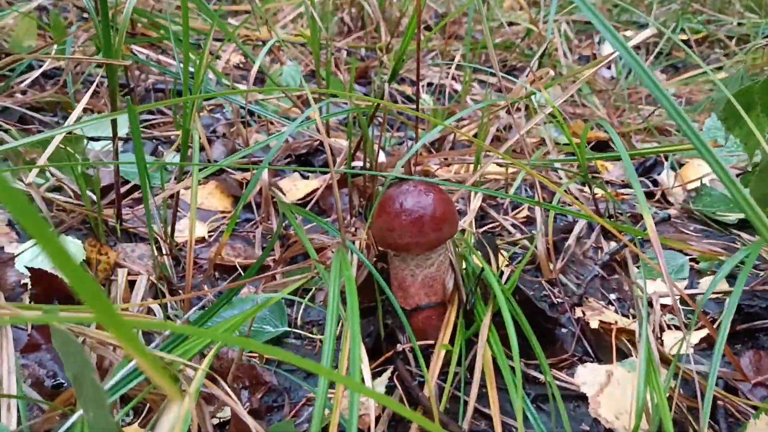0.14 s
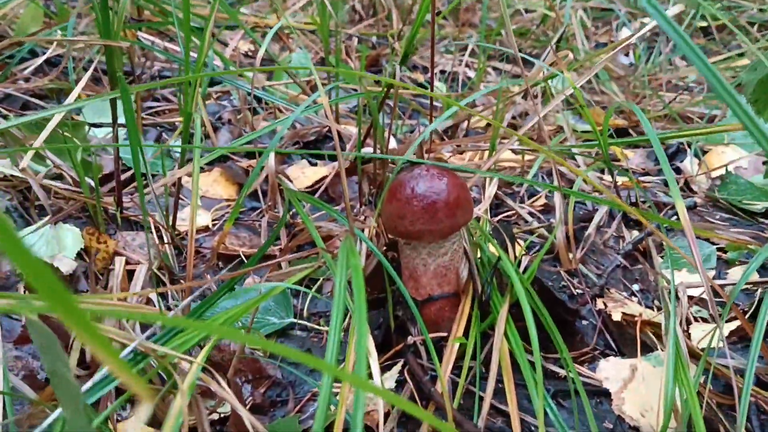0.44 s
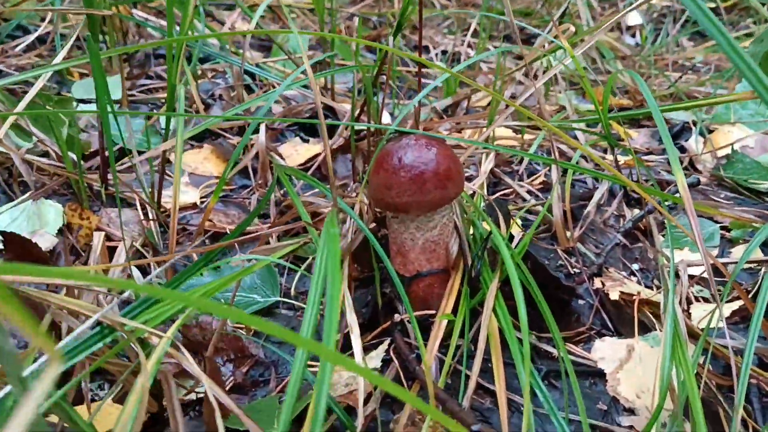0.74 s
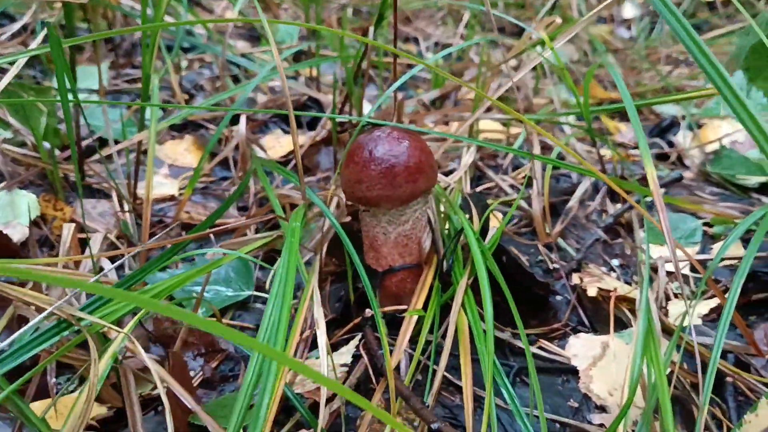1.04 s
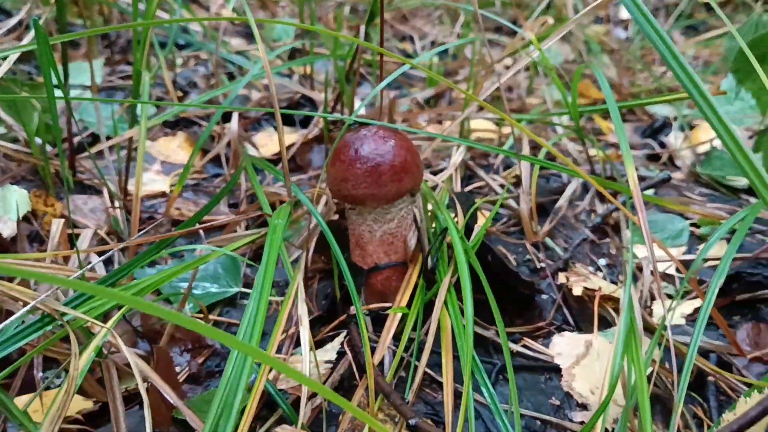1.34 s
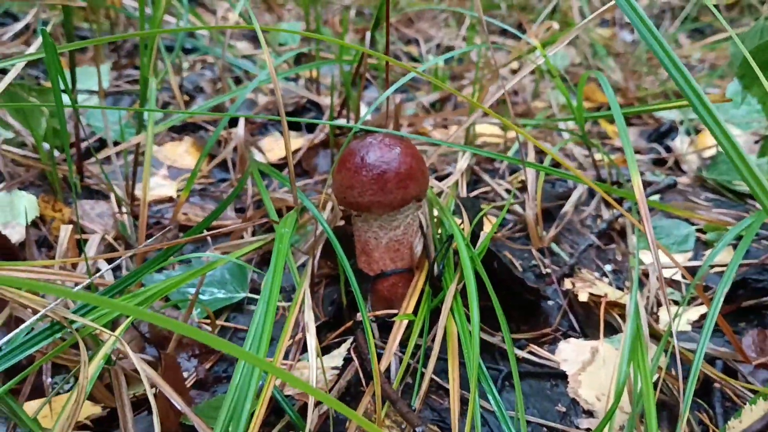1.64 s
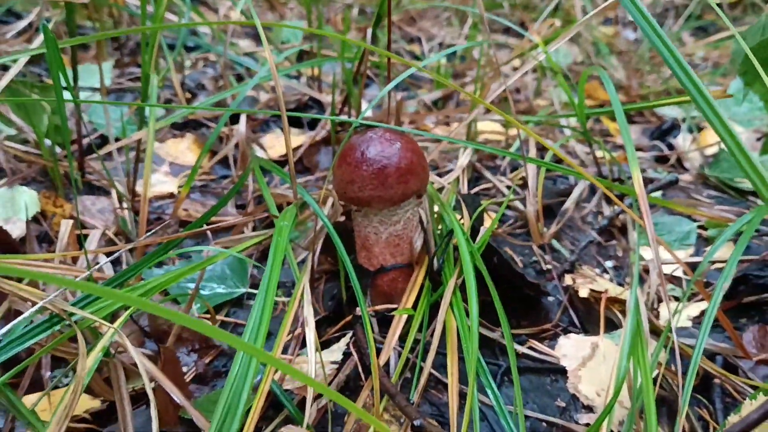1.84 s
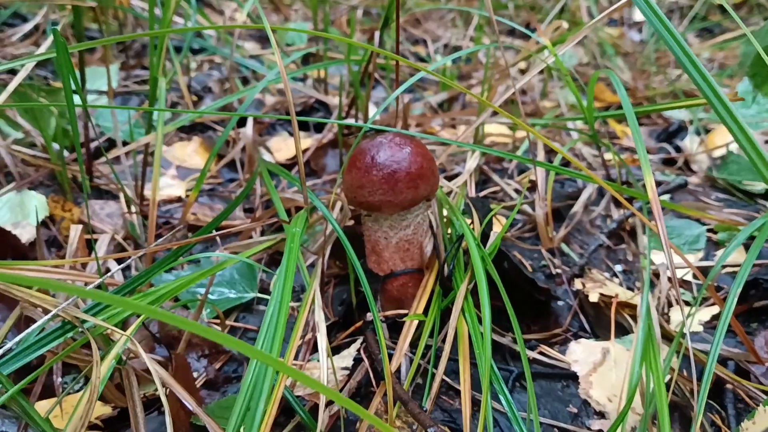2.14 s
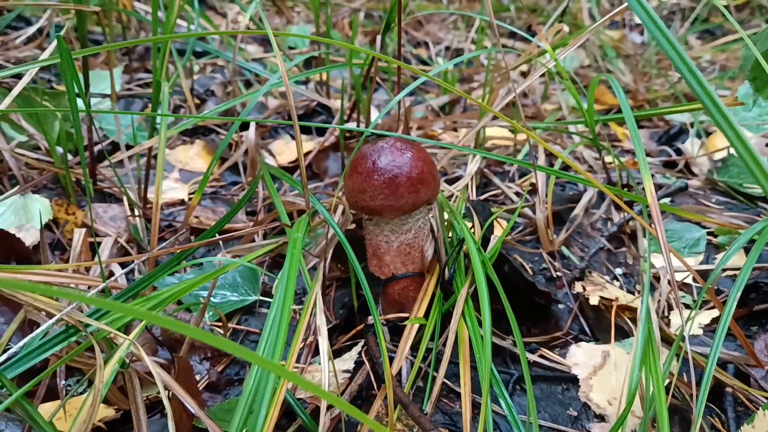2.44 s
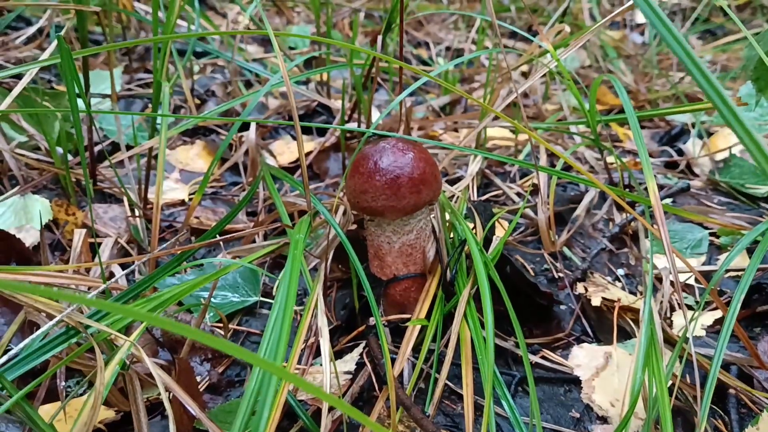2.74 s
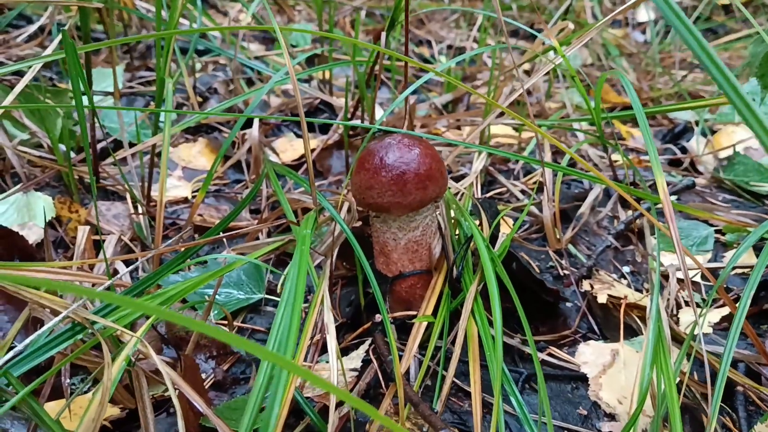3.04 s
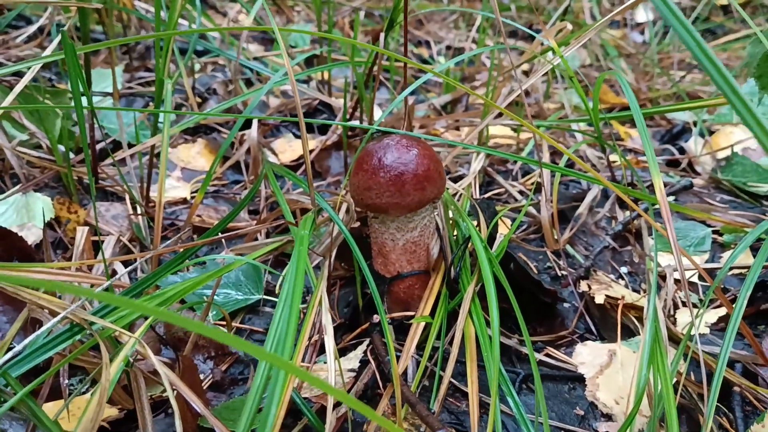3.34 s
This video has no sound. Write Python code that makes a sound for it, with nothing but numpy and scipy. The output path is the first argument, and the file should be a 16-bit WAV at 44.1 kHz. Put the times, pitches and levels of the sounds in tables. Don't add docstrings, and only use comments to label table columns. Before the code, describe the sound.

Water drops fall on wet leaves and grass under trees, a steady soft hiss with sparse ticks and thuds; a hard knock at two seconds, a crisp splat near three, heard by a low handheld stereo microphone.

```python
import sys
import numpy as np
from scipy import signal
from scipy.io import wavfile
from scipy.ndimage import uniform_filter1d

SR = 44100
rng = np.random.default_rng(int(sys.argv[2]) if len(sys.argv) > 2 else 0)


def dump(signal):
    limited = np.clip(np.atleast_2d(signal).T, -1, 1)
    pcm = np.round(limited * 32767).astype(np.int16)
    wavfile.write(sys.argv[1], SR, pcm)


def invert_db(x):
    u = np.asarray(x, float) / 20
    return 10 ** u


N = 154350

# pitch_hz, level_db (per Hz)
HISS_COLOUR = [(300, -9), (800, -5.5), (1500, -1.5), (2100, 2), (3300, -1), (4200, -7), (6500, -7.5),
               (8500, -11.5)]
# pitch_hz, level_db (per Hz)
MIST_COLOUR = [(8000, -13), (10000, -16.5), (13000, -17.5), (16500, -24.5)]
# pitch_hz, level_db (per Hz)
RUMBLE_COLOUR = [(20, -35), (35, -29), (60, 3), (100, 0), (150, -10.5), (300, -6.5), (600, -16)]
# pitch_hz, likeness (-1 to 1)
LIKENESS = [(60, 0.54), (240, 0.65), (950, -0.19), (3770, 0.054), (15000, 0.01)]
# pitch_hz, left_minus_right_db
BALANCE = [(60, 5.5), (130, -4.5), (290, 0), (640, -0.5), (1410, 0.5), (3100, -3), (6820, -10.5),
           (15000, 10)]
# time_s, shade (0-1), level_db
POSE = [
    (0, 1, 1.5),
    (.4, 1, 1),
    (.62, 0, 0.5),
    (1.8, 0.23, 1.53),
    (3.1, 0, 0.5),
    (3.5, 0.14, -0.8),
]
# pitch_hz, level_db
PATTER_COLOUR = [(100, -1.5), (700, 19), (2500, 9), (6000, -11), (14000, -3.5)]
# start_s, peak_db, pitch_hz, left_minus_right_db, left_late_ms
THUDS = [(0.252, -42, 86, -16, 0.21), (.443, -39, 151, -27, -0.15), (0.454, -39.5, 78, -27, 0),
         (0.7517, -35.5, 605, 6, -0.38), (0.8009, -33.5, 280, -3, 0.38), (0.8103, -39.5, 173, 0, 0),
         (1.018, -43.5, 156, 2, 0), (1.2422, -43, 413, 1, 0.2), (1.7595, -44.5, 260, -23, -0.18),
         (1.825, -41.5, 327, -2, 0.094), (1.9084, -31, 340, -19, 0.11), (1.9414, -33, 230, -22.5, 0.082),
         (1.948, -39.5, 100, -18, 0), (2.0422, -42.5, 300, -24, 0), (2.098, -38.5, 231, -23, 0),
         (2.531, -39.5, 263, -19, 0.32), (2.9392, -25, 183, 19, 0.19), (2.9466, -44, 130, 12, 0.35),
         (3.002, -42, 307, -1, 0.32)]
# start_s, peak_db
KNOCKS = [
    (1.911, -28),
    (2.0047, -14),
]
# start_s, peak_db, pitch_hz, left_minus_right_db
TICKS = [(0.2388, -34, 2670, 2.5), (0.2889, -25.5, 2750, -11.5), (0.8001, -36, 1750, -1),
         (1.3446, -37, 2170, -1), (1.4365, -32.5, 2220, 4), (1.4507, -36.5, 1300, 3),
         (1.509, -35, 3080, -9), (1.9080, -27, 890, -14), (.7512, -39, 2100, 0),
         (2.0028, -10.5, 1040, -10.5), (2.0026, -18, 2030, -21), (2.0049, -23.5, 3530, -7),
         (2.3414, -32.5, 2950, 2), (2.617, -34.5, 1010, 4), (2.652, -33.5, 1630, -1),
         (2.672, -31.5, 1900, -3), (2.9389, -28.5, 1900, 3.5), (2.9594, -23, 2170, 3.5),
         (2.9638, -11.5, 2860, -3), (2.9690, -20.5, 2040, 10), (3.1452, -36, 2070, 11),
         (3.1752, -24, 1730, -10), (3.1795, -37, 910, -22), (3.1812, -24.5, 1360, -15),
         (3.183, -26.5, 930, -20), (3.386, -44, 1230, -2)]
# start_s, rms_db, pitch_hz, fade_ms, left_minus_right_db
SPRAYS = [(.2384, -37, 14000, 6.8, 25), (0.7507, -37.5, 11700, 12, 17), (0.8009, -35.5, 7200, 35, -14),
          (3.1803, -43, 12500, 15, -10), (1.4440, -33, 3250, 38, -8), (1.451, -47, 12500, 15, 13),
          (1.478, -47, 9000, 12, -8), (1.4785, -30.5, 3450, 25, -11), (2.0030, -26, 7400, 7.6, -35),
          (2.1433, -39.5, 2580, 120, -15), (2.5749, -26.5, 7900, 6.1, -23), (2.5787, -28.5, 16000, 19, -1),
          (2.651, -37.5, 6000, 23, -19), (2.938, -45, 6060, 23, -15), (2.9458, -22, 12400, 10.7, 1),
          (3.0644, -48, 11000, 25, 8), (3.069, -42, 8800, 43, -2), (3.1750, -42, 12000, 9, -8),
          (3.3037, -41, 13000, 9.3, 11), (3.386, -47.5, 10700, 25, 8)]
# start_s, rms_db, fade_ms
SHATTER = [
    (2.9594, -20.5, 34),
    (2.9592, -23, 10),
    (2.9615, -20.5, 16),
    (2.9628, -15.5, 10.8),
    (2.9638, -11.5, 9.9),
    (2.9652, -17, 7.5),
    (2.9688, -29.5, 13),
    (2.9708, -18, 11),
]
# pitch_hz, width_hz, level_db
LEAF = [(1900, 670, -1), (2830, 700, 2.5), (5160, 540, -6), (7200, 1070, -4.5), (10800, 1700, -15.5),
        (15000, 1800, -30)]

HISS_DB, RUMBLE_DB = -49, -61
SHADE_HZ, SHADE_OCTAVES, SHADE_DB = 7300, 0.2, -8
SPITS_PER_S, SPITS_DB, SPIT_FADE_MS, SPIT_HZ, SPIT_WIDTH_HZ = 45, -66.5, 14, 9000, 12000
PATTER_PER_S, PATTER_DB, PATTER_SPREAD_DB = 260, -67, 4.0
ECHO_DB, ECHO_T60_S = -23.5, 0.079
THUD_CYCLES, THUD_SAG, THUD_RISE = 4.6, 0.067, 0.04
SHELL_HZ, SHELL_CYCLES, SHELL_SIDE_DB, SHELL_LATE_MS = 424, 9.4, 2, -0.63
REBOUND_HZ, REBOUND_DB, REBOUND_SIDE_DB, REBOUND_EARLY_S = 145, -5.5, -9, 0.002
TICK_CYCLES, TICK_STIFF, TICK_SAG, TICK_RISE = 4.08, 0.41, 0.087, 0.17
LAG_MS_PER_DB = 0.03
SPRAY_WIDTH, SPRAY_WIDE_DB, SPRAY_RISE_MS = 0.32, -14, 0.19
LEAF_SIDE_DB, LEAF_LIKENESS = -7, 0.8
LOW_CUT_HZ, EDGE_HZ, EDGE_DB = 75, 15900, -32


def evened(x):
    return x / np.sqrt(np.mean(x ** 2) + 1e-20)


def read(points, hz):
    f, value = np.transpose(points)
    return np.interp(np.log(hz + 1), np.log(f + 1), value)


def add(mix, start_s, sound, side_db, late_ms=0.):
    share = invert_db(side_db) / (1 + invert_db(side_db))
    places = [(share, start_s + late_ms / 1000), (1 - share, start_s)]
    for ear, (gain, at) in enumerate(places):
        part = mix[ear, round(at * SR):][:sound.shape[-1]]
        part += 2 * gain * np.atleast_2d(sound)[-ear][:len(part)]


def resonate(x, hz, width_hz):
    pole = np.exp((2j * np.pi * hz - np.pi * width_hz) / SR)
    return 2 * signal.lfilter([1 - abs(pole)], [1, -pole], x).real


def plop(hz, cycles, sag, rise):
    u = np.arange(round(SR / hz * 14)) * hz / SR
    swing = -np.sin(2 * np.pi * np.log1p(sag * u) / sag)
    shape = swing * (1 - np.exp(-u / rise)) ** 2 * invert_db(-60 * u / cycles)
    return shape / abs(shape).max()


def burst(fade_ms, likeness):
    ms = np.arange(2600) * 1000 / SR
    one, other = rng.standard_normal((2600, 2)).T
    pair = np.array([one, likeness * one + np.sqrt(1 - likeness ** 2) * other])
    return pair * (1 - np.exp(-ms / SPRAY_RISE_MS)) * invert_db(-60 * ms / fade_ms)


def wash(size, colour_db, patchy_db, flicker_db, shaded):
    hop = size // 4
    frames, hz = N // hop + 5, np.fft.rfftfreq(size, 1 / SR)
    a, b, c, d, patches = rng.standard_normal((frames, len(hz), 5)).T
    patches = uniform_filter1d(patches, size=6, axis=0)
    patches = evened(uniform_filter1d(patches, size=12, axis=1))
    flicker = evened(uniform_filter1d(rng.standard_normal(frames), size=4))

    t = np.arange(frames) * hop / SR
    pose_s, shade, level_db = np.transpose(POSE)
    octaves = np.log2((hz + 1) / SHADE_HZ)
    dip_db = SHADE_DB * np.exp(-0.5 * (octaves / SHADE_OCTAVES) ** 2)
    pose_db = np.outer(dip_db, np.interp(t, pose_s, shade)) + np.interp(t, pose_s, level_db)

    same = np.clip(read(LIKENESS, hz), -1, 1)[:, None]
    left = a + 1j * b
    z = np.array([left, same * left + np.sqrt(1 - same ** 2) * (c + 1j * d)])
    z *= invert_db(colour_db(hz)[:, None] + shaded * pose_db + patchy_db * patches + flicker_db * flicker)
    z *= invert_db(np.outer([0.5, -0.5], read(BALANCE, hz)))[:, :, None]
    return evened(signal.istft(z, nperseg=size, noverlap=size - hop)[1][:, :N])


def rumble():
    pose_s, shade, _ = np.transpose(POSE)
    stirring = np.interp(np.arange(N) / SR, pose_s, shade)
    colour = lambda hz: read(RUMBLE_COLOUR, hz) - hz / 60
    return invert_db(RUMBLE_DB + 2.5 * stirring) * wash(1024, colour, patchy_db=0.4, flicker_db=0.9, shaded=0)


def hiss():
    def colour(hz):
        drops_and_mist = np.where(hz < HISS_COLOUR[-1][0], read(HISS_COLOUR, hz), read(MIST_COLOUR, hz))
        return drops_and_mist - 40 * (hz < 150)
    return invert_db(HISS_DB) * wash(256, colour, patchy_db=1.52, flicker_db=1.16, shaded=1)


def spits():
    size = invert_db(2.8 * np.minimum(rng.exponential(1, N), 3)) * (rng.random(N) < SPITS_PER_S / SR)
    share = rng.uniform(0.35, 1.0, N)
    fade = invert_db(-60 * np.arange(2000) * 1000 / SR / SPIT_FADE_MS)
    level = signal.oaconvolve([size * share, size * (1 - share)], fade[None], axes=1)[:, :N]
    puffs = level * rng.standard_normal((N, 2)).T
    return invert_db(SPITS_DB) * evened(resonate(puffs, SPIT_HZ, SPIT_WIDTH_HZ))


def patter(count=30):
    size = invert_db(PATTER_SPREAD_DB * np.minimum(rng.exponential(1, N), 4))
    size = size * (rng.random(N) < PATTER_PER_S / SR)
    kind, out = rng.integers(0, count, N), np.zeros((2, N))
    for k, hz in enumerate(np.geomspace(PATTER_COLOUR[0][0], PATTER_COLOUR[-1][0], count)):
        side_db, late_ms = rng.uniform(-1.32, 1, 2) * [9, 0.4]
        drops = signal.oaconvolve(size * (kind == k), plop(hz, 4.3, 0.05, 0.18))
        add(out, 0.001, invert_db(read(PATTER_COLOUR, hz)) * drops, side_db, late_ms)
    return invert_db(PATTER_DB) * evened(out)


def undergrowth(x):
    t = np.arange(6000) / SR
    stems = rng.standard_normal((6000, 2)) * (rng.random((6000, 2)) < 0.05)
    taps = stems.T * invert_db(-60 * t / ECHO_T60_S) * (t > 0.003)
    taps = taps / np.linalg.norm(taps[0])
    return invert_db(ECHO_DB) * signal.fftconvolve(x.mean(0)[None], taps, axes=1)[:, :N]


def thuds(mix):
    for start_s, db, hz, side_db, late_ms in THUDS:
        add(mix, start_s, invert_db(db) * plop(hz, THUD_CYCLES, THUD_SAG, THUD_RISE), side_db, late_ms)


def knocks(mix):
    for start_s, db in KNOCKS:
        ring = invert_db(db) * plop(SHELL_HZ, SHELL_CYCLES, 0.005, 0.08)
        add(mix, start_s, ring, SHELL_SIDE_DB, SHELL_LATE_MS)
        rebound = -invert_db(db + REBOUND_DB) * plop(REBOUND_HZ, 2.2, 0.03, 0.015)
        add(mix, start_s - REBOUND_EARLY_S, rebound, REBOUND_SIDE_DB)


def ticks(mix):
    for start_s, db, hz, side_db in TICKS:
        cycles = TICK_CYCLES * (hz / 1000) ** TICK_STIFF
        tick = invert_db(db) * plop(hz, cycles, TICK_SAG, TICK_RISE)
        add(mix, start_s, tick, side_db, -LAG_MS_PER_DB * side_db)


def sprays(mix):
    for start_s, db, hz, fade_ms, side_db in SPRAYS:
        puff, width_hz = burst(fade_ms, 0.14), SPRAY_WIDTH * hz
        tinted = resonate(resonate(puff, hz, width_hz), hz, width_hz)
        wide = invert_db(SPRAY_WIDE_DB) * resonate(puff, 7900, 12000)
        add(mix, start_s, invert_db(db + 3.5) * (tinted + wide), side_db)


def shatter(mix):
    for start_s, db, fade_ms in SHATTER:
        puff = burst(fade_ms, LEAF_LIKENESS)
        spurt = np.zeros_like(puff)
        for hz, width_hz, ring_db in LEAF:
            once = resonate(puff, hz, 1.5 * width_hz)
            spurt += invert_db(ring_db) * resonate(once, hz, 1.5 * width_hz)
        add(mix, start_s, invert_db(db + 7) * spurt, LEAF_SIDE_DB)


def near_drops():
    mix = np.zeros((2, N))
    for source in (thuds, knocks, ticks, sprays, shatter):
        source(mix)
    return mix


def scene():
    near = near_drops()
    return rumble() + hiss() + spits() + patter() + undergrowth(near) + near


def band_limit(x):
    return signal.sosfilt(signal.butter(12, 17170, fs=SR, output="sos"), x)


def record(dry):
    bass_cut = signal.butter(2, LOW_CUT_HZ, "high", fs=SR, output="sos")
    cut = signal.sosfilt(bass_cut, dry)
    edge = signal.firwin(511, EDGE_HZ, window=("kaiser", 9), fs=SR)
    below = signal.oaconvolve(cut, edge[None], "same")
    mix = below + invert_db(EDGE_DB) * (cut - below)
    return band_limit(mix)


dry = scene()
out = record(dry)
dump(out)
```